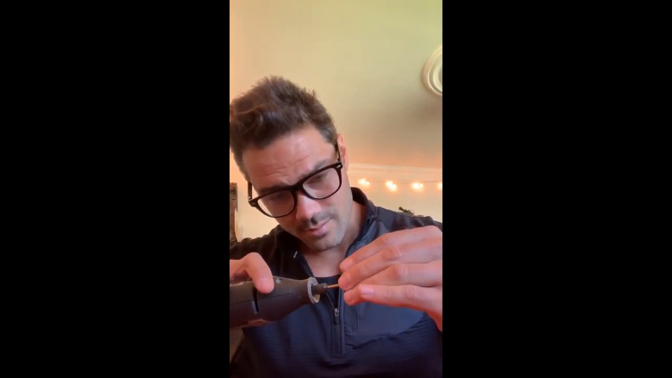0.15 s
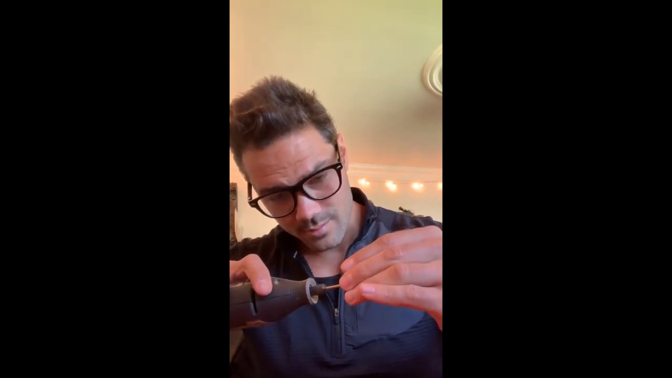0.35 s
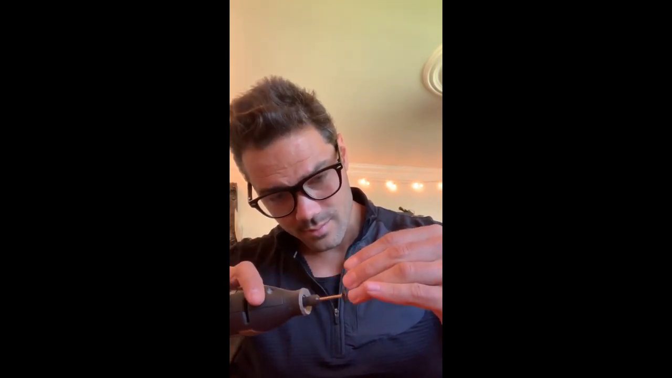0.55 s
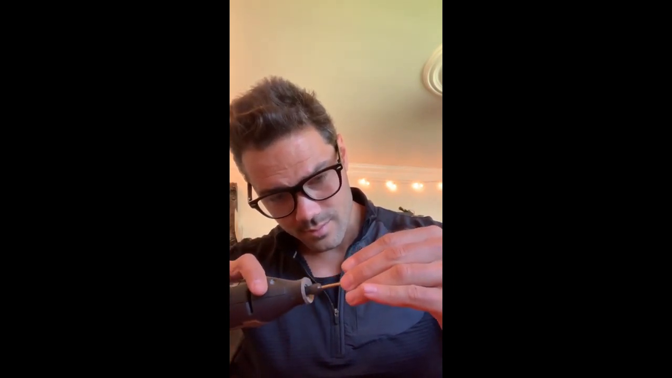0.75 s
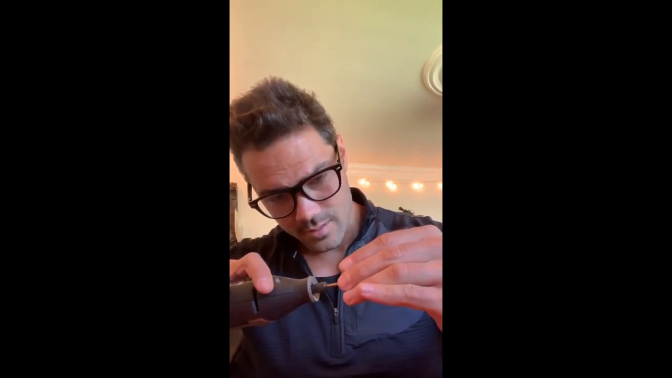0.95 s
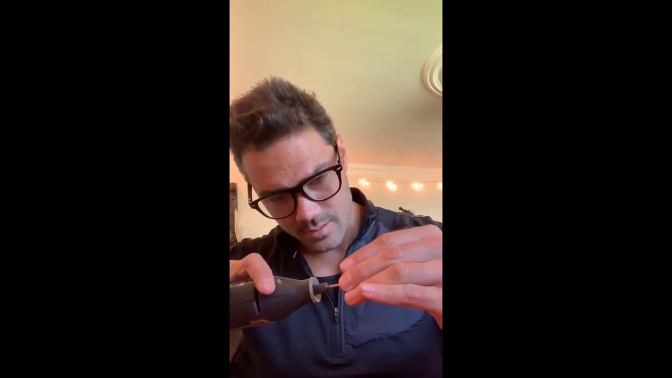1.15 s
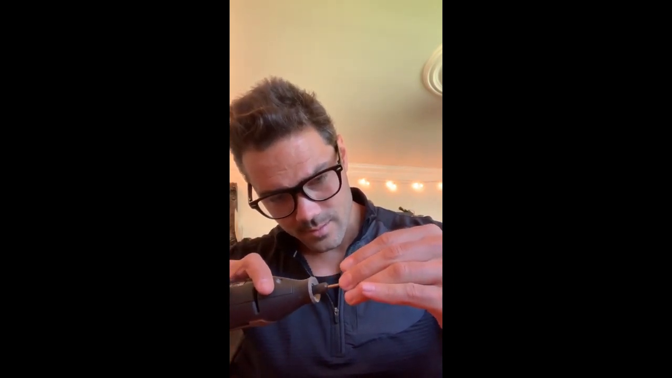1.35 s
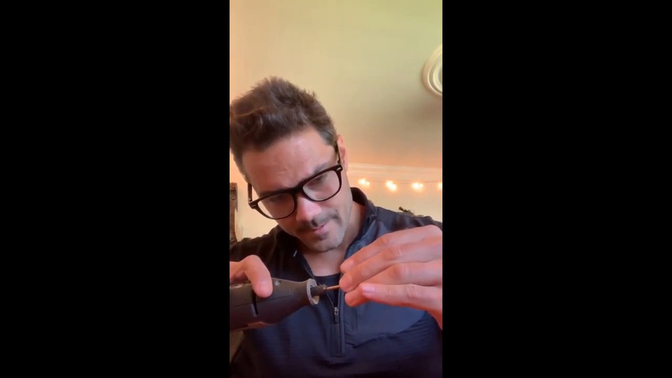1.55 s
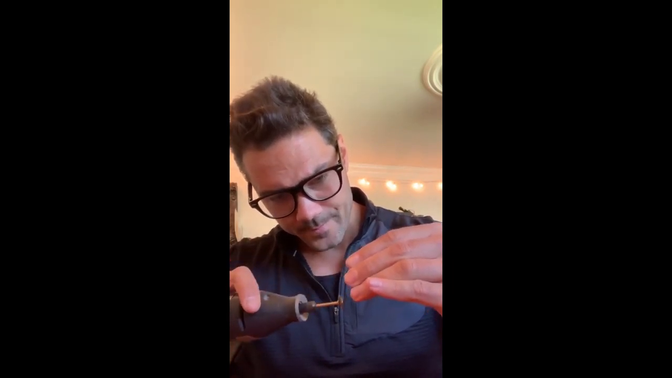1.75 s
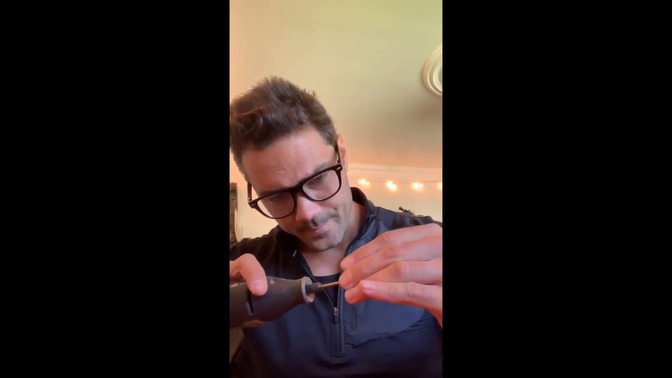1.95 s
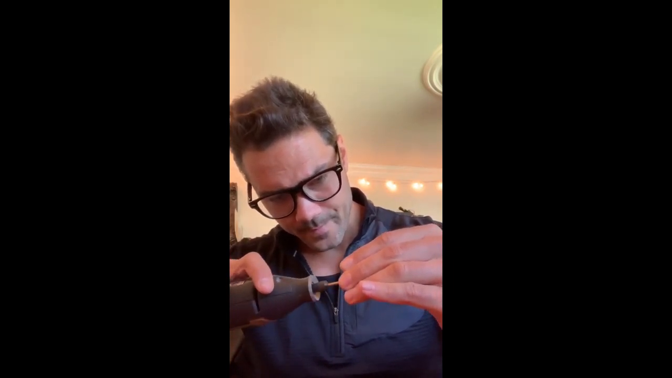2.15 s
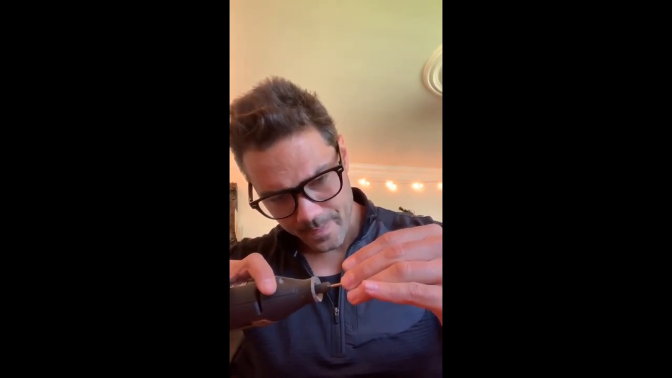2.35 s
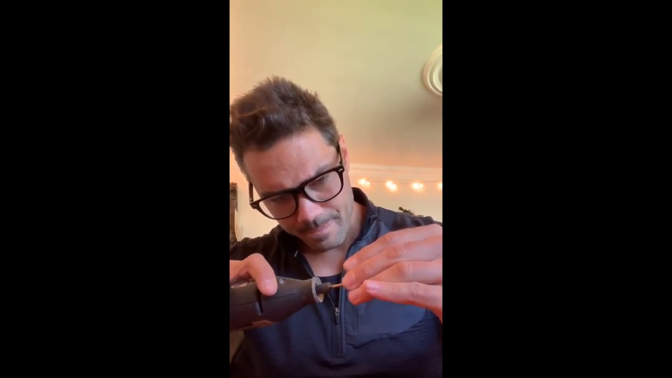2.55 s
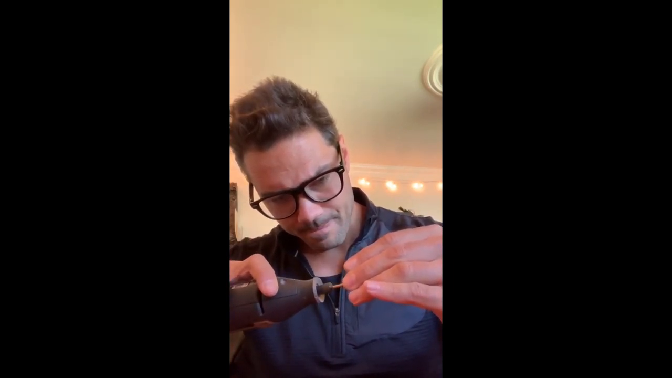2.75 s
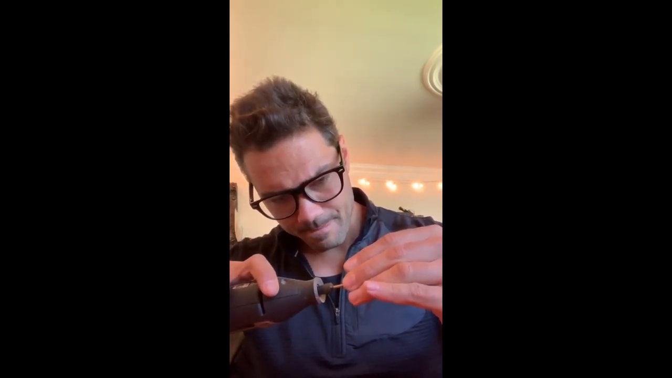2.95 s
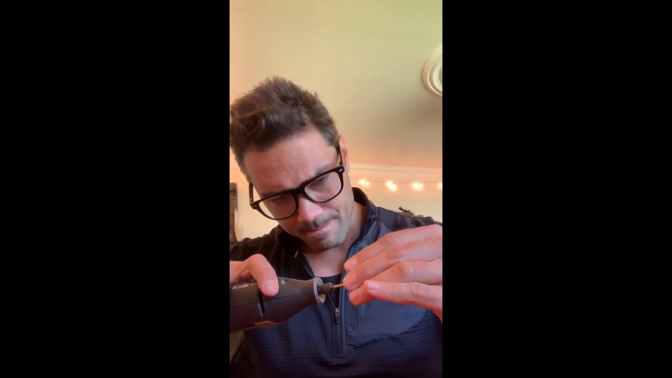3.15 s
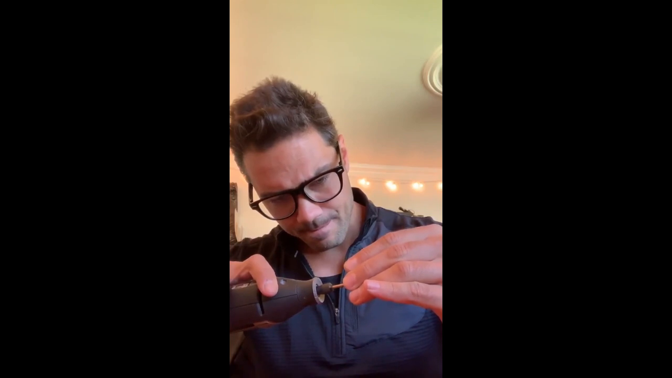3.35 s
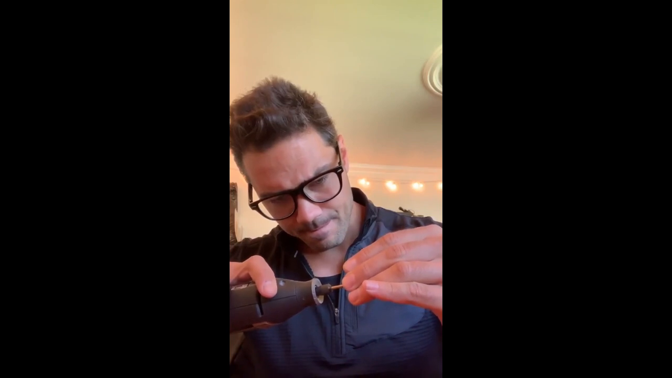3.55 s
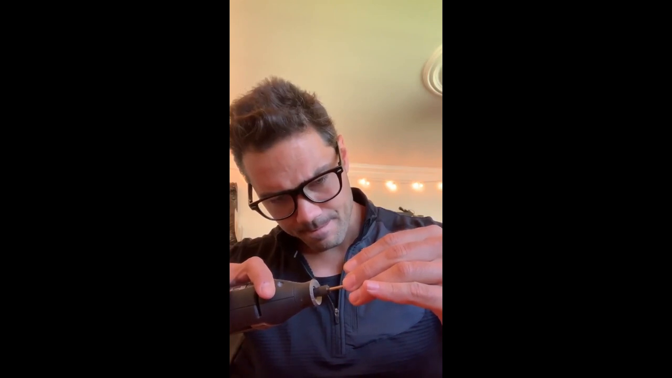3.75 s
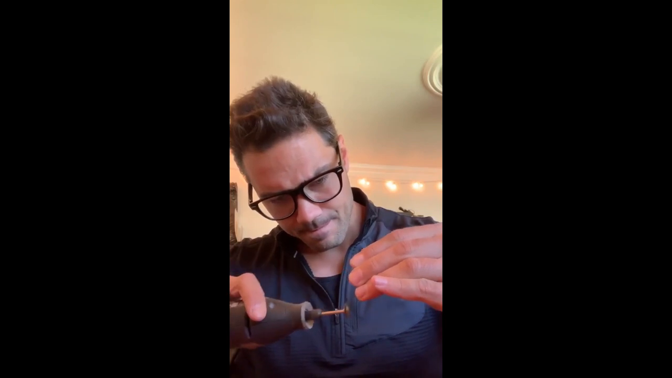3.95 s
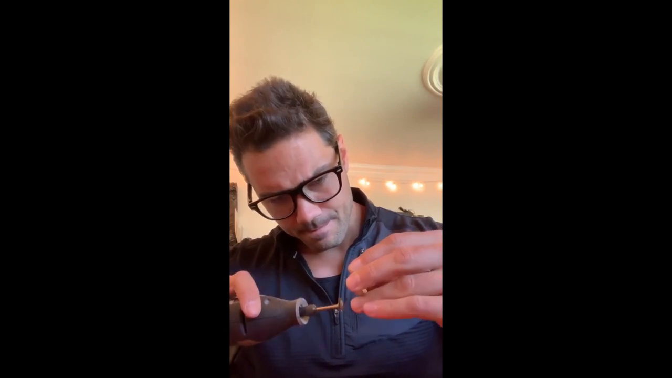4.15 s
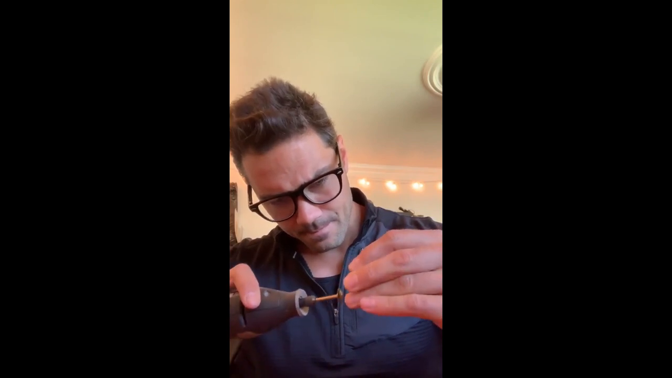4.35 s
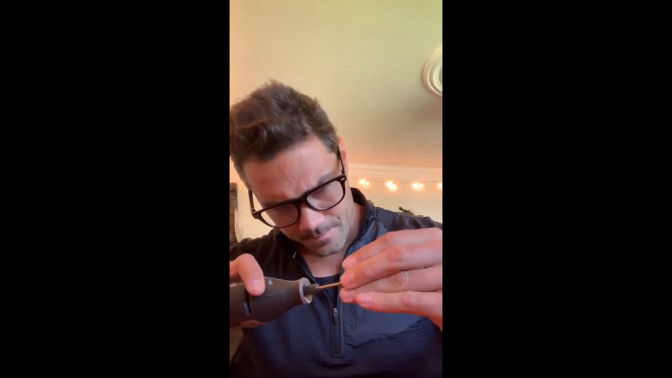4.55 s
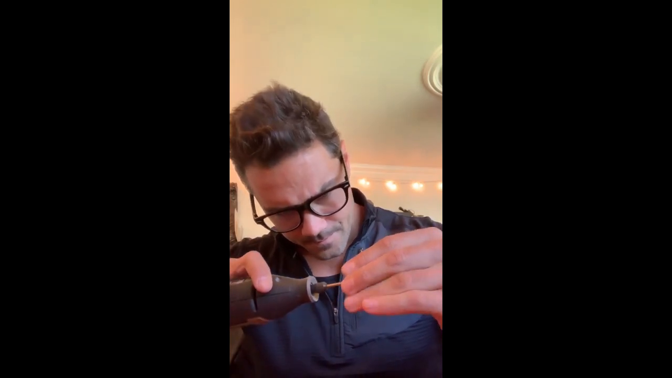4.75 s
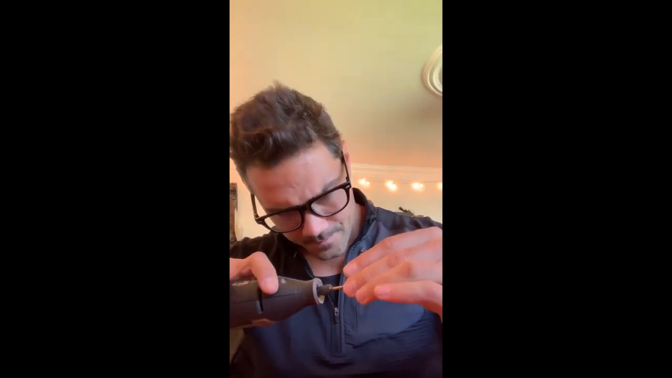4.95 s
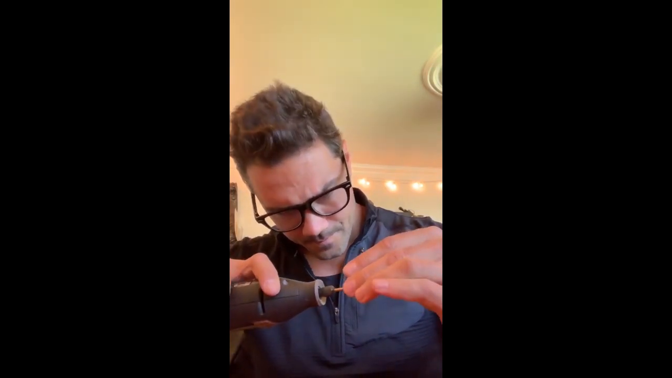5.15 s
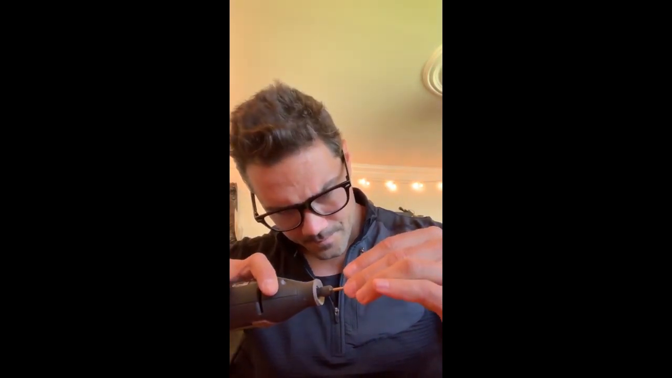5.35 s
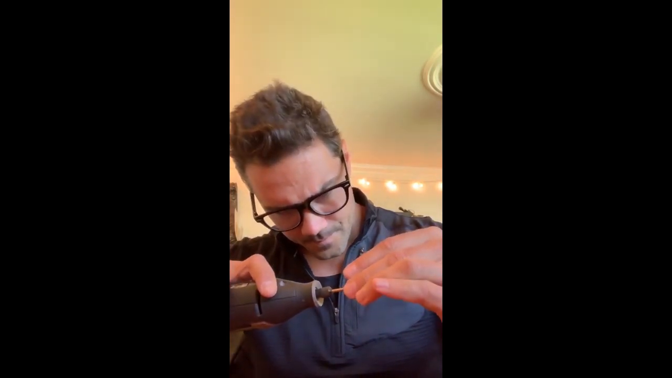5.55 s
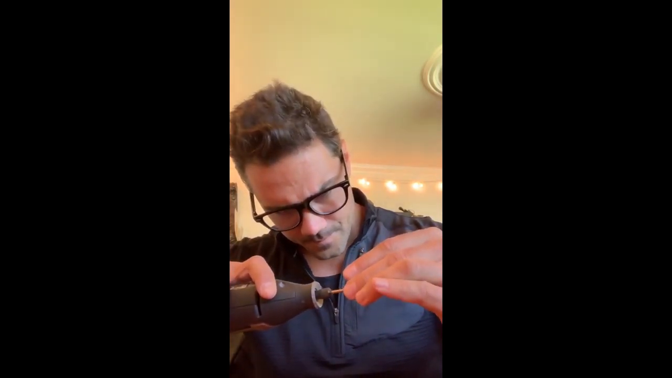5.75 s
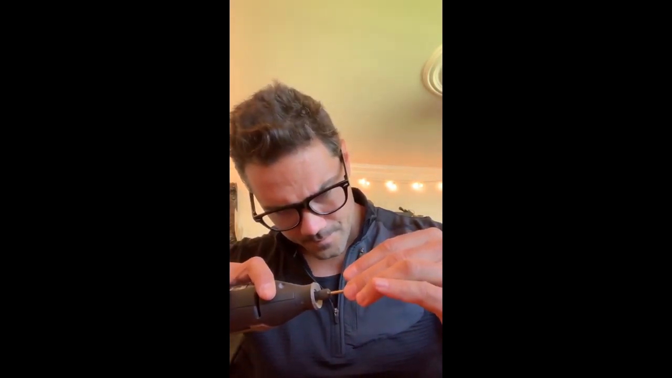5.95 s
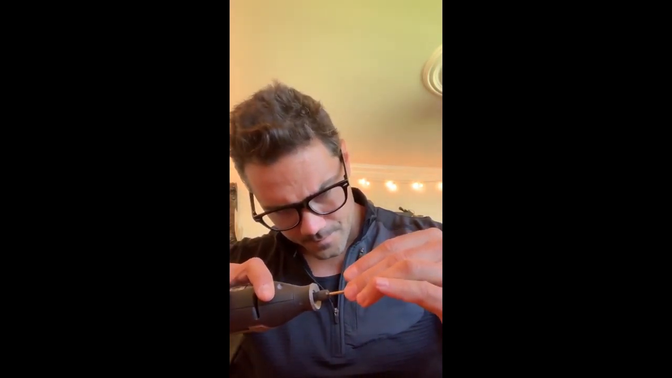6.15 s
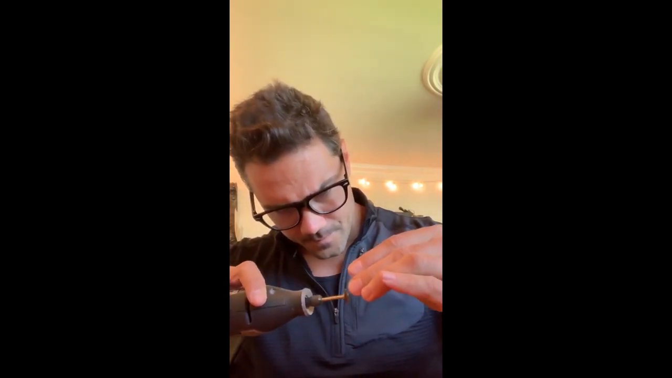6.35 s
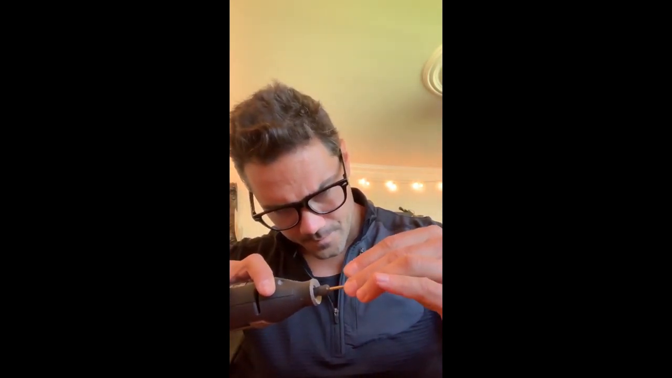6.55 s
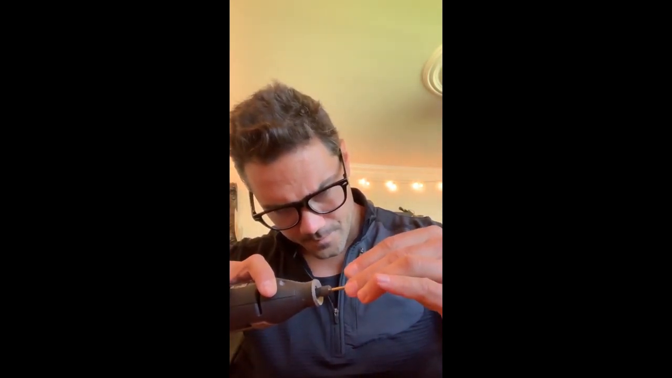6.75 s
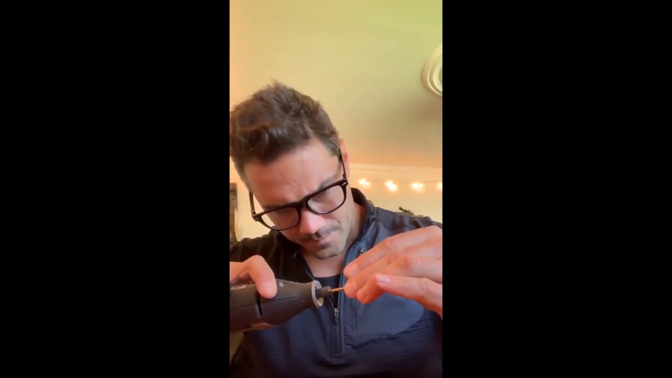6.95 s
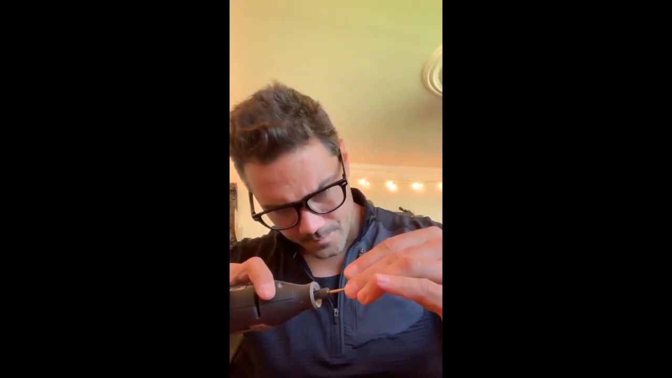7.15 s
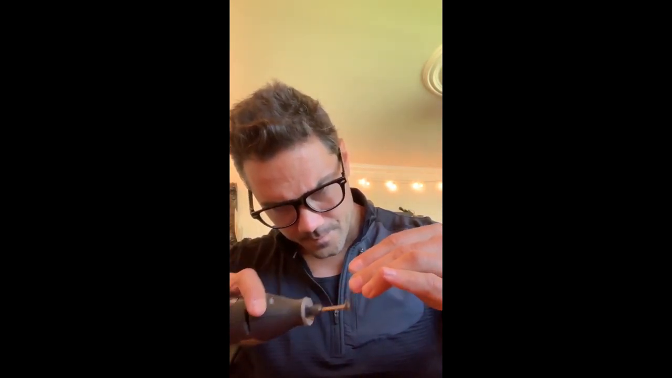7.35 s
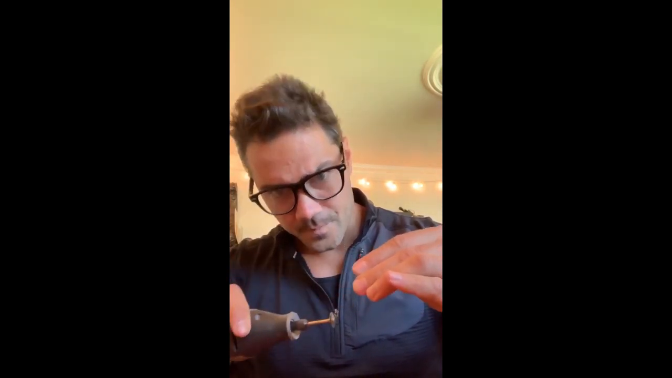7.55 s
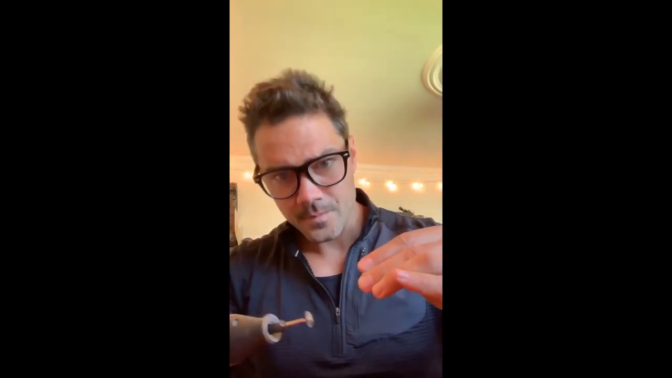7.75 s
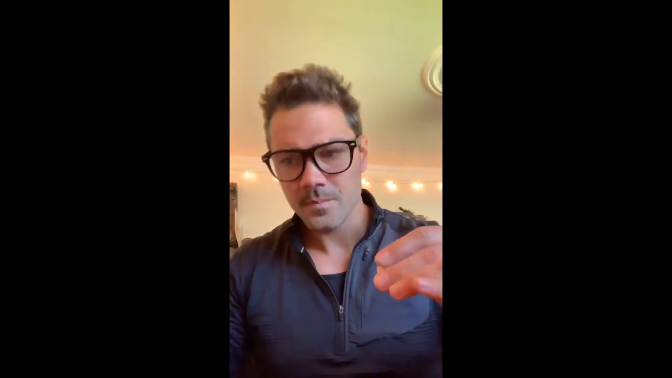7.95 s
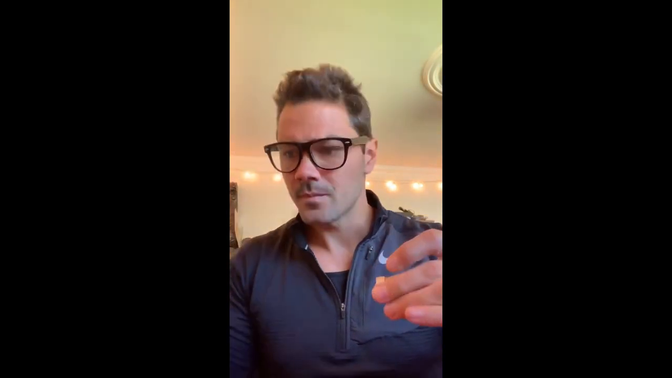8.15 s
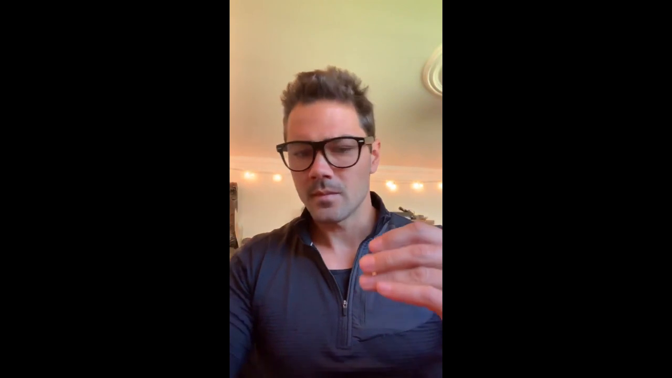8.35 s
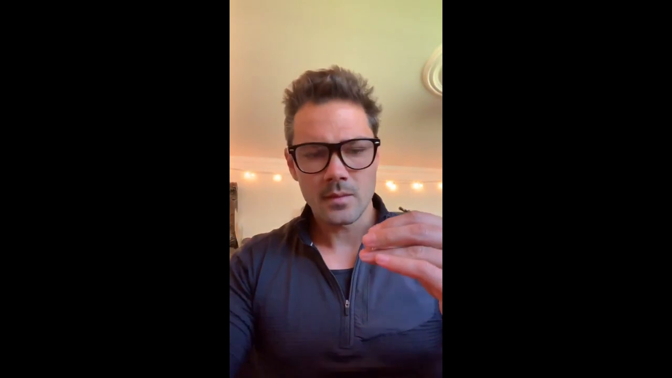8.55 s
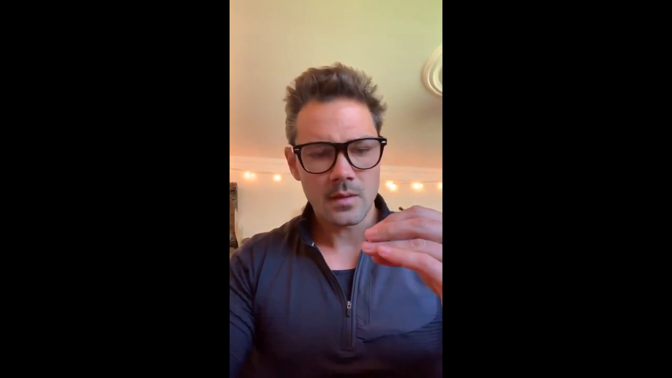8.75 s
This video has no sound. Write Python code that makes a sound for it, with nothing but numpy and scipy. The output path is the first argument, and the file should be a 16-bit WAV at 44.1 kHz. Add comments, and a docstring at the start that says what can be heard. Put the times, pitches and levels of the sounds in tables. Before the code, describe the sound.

A small handheld rotary tool is already at full speed, close to a stereo microphone in a small room. A firm low motor hum near 375 Hz, buzzing overtones and a thin whine around 9 kHz sit inside strong, bright fan hiss, with a rapid electric throb. From 0.2 s a felt tip polishes metal in irregular strokes, with light contact and harder presses around 0.5, 1.7, 3.9, 6.1 and 7.3 s; each adds a rough, beating rub and pulls the pitch down slightly before it recovers. Around 4.0-4.5 s and again at 7.5 s the vents turn closer and the airy jet brightens. The tip lifts at about 7.45 s and the motor runs free. At 7.9 s it is switched off: the throb stops, and pitch, whine and hiss fall steadily through faint patchy brush ticking, still coasting at 8.8 s over quiet room air and low rumble.

```python
"""Rotary tool polishing metal

A hand-held rotary tool runs at full speed in a small room; a felt tip is pressed on a small metal piece in strokes.
Shaft, armature slots and commutator sing as cosines at multiples of the turning rate, which sags under load.
Fan hiss and room air are coloured noise in stereo. After the switch the tool coasts down and the brushes tick.
"""
import sys
import numpy as np
from scipy import signal
from scipy.fft import rfft, irfft, next_fast_len
from scipy.io import wavfile

SR = 44100
rng = np.random.default_rng(int(sys.argv[2]) if len(sys.argv) > 2 else 0)


def materialize(psi):
    """Save the field psi as 16-bit PCM at rate SR to the path in sys.argv[1].

    A 1-D psi becomes a single channel; in a 2-D psi each row is a channel.
    """
    bounded = np.clip(np.atleast_2d(psi).T, -1, 1)
    quanta = np.round(bounded * 32767).astype(np.int16)
    wavfile.write(sys.argv[1], SR, quanta)


N = 388521

# Room air, rumble, mains hum: freq_hz, relative_db_per_hz
ROOM_AIR = [(250, -20), (480, -8), (640, -12), (950, 0), (1400, -4), (2200, -7), (3000, -20), (6000, -30)]
RUMBLE = [(8, -13), (25, 0), (40, -7), (85, -1), (170, -6.5), (400, -29.5), (900, -69)]
MAINS_HUM = [(40, -48.5), (56, -16.5), (61, -0.5), (66, -12), (85, -50)]
# Low background: time_s, hum_db, hum_octave_db, rumble_db
LOW_LEVELS = [(0, -55, -58, -50), (0.5, -52, -56, -48), (0.9, -60, -58, -53), (2, -64, -61, -55),
              (3.8, -67, -65, -57), (4.3, -58, -59, -52), (5.5, -54, -56, -51), (6.35, -62, -56, -52),
              (6.65, -48, -54, -51), (6.95, -62, -55, -54), (7.4, -40, -50, -54), (7.85, -57, -50, -52),
              (8.1, -49, -51, -51), (8.81, -49, -49, -53)]
ROOM_AIR_DB = -43.5

# Stereo noise: freq_hz, likeness_0_to_1 / left_lead_rad / left_minus_right_db
LIKENESS = [(60, 1), (450, 0.99), (1500, 0.73), (2000, 0.28), (2800, 0.56), (3400, 1), (4400, 0.42),
            (5000, 0.34), (6300, 0.22), (6900, 0.46), (8200, 0.66), (9100, 1), (16000, 1)]
LEFT_LEAD = [(10, 0), (130, -.3), (1200, -.3), (1700, 0), (2400, -1.5), (3300, -.6), (4100, .3),
             (4800, -2.8), (6100, -3.2), (6600, -7), (8400, -2 * np.pi), (16000, -2 * np.pi)]
TILT = [(30, .3), (130, 2.5), (390, 3.5), (1200, 2), (1600, 0), (2200, 4), (2800, -1), (6000, 0),
        (6600, -2), (7500, 0), (16000, 0)]

# Fan hiss and air jet: freq_hz, relative_db_per_hz
HISS = [(120, -20.5), (200, -18), (330, -9), (630, -19.5), (1000, -9), (1300, -6), (1680, -13), (2400, -6),
        (3500, -7), (5300, -4), (7500, -5), (9000, -3.5), (13000, -6.5), (15500, -4.5)]
JET = [(6000, -22), (8500, -5.5), (10200, -5.5), (11500, -6), (13000, -3.5), (15500, -14.5)]
# Housing resonances in the hiss: freq_hz, width_hz, gain_db
HOUSING = [(490.4, 91, 8.5), (860, 122, 10.5), (1535.3, 41.6, 3.5), (1864, 90, 4.5), (2174, 112, 4.5),
           (3866, 1010, 4.5), (6920, 483, 4)]

# Tones: multiple_of_turn (rounded in use), db_over_layer, left_minus_right_db, left_lead_rad
HUM = [(1, 0.5, 3.5, -0.445)]
RUB = [(2, 1, -0.5, -0.22), (6, 0, 12, -0.31), (4, -11.5, -3.5, -0.0036)]
BEARING = [(3, 0, 4, -0.37), (5, -12.5, -2, 0.5)]
FAN = [(12, 1, -0.5, 0.4262), (4, -9, -1.5, 0.5), (6, -7, 6.5, 1.3), (13, 0, -2.5, -2.5), (15, 1, -0.5, 3),
       (16, -3.5, 3, -2.5), (17, -3.5, 1, 1.51)]
BLADE = [(12, 0, -0.5, 0.4)]
COMMUTATOR_BARS = [(24, 1.5, 0, -0.256), (25, -11.5, 0, 0), (23, -13.5, 0, 0)]
UPPER = [(31, -6.5, 0, 0), (32, 1, 0, 0), (33, -2.5, 0.0011, 0), (40, -2.5, 0.00092, 0), (41, -3, 0.001, 0),
         (48, 5, 0, 0), (51, -2.5, 0, 0), (56, 6.5, 0, 0), (64, 1.5, 0, 0), (63.3, 4.5, 0, 0),
         (72, 2, 0, 0), (80, 0.5, 0, 0)]
# Slot tone sidebands: throb_multiple, db_over_pull, left_minus_right_db, left_lead_rad
THROB = [(-3, -9.5, 0.5, -2), (-2, -2, 0, -1.9), (-1, -1, -2.5, 1), (0, -12, 6.5, -3), (1, -9.5, -3, -1.6),
         (2, -9, 0, 1.5), (3, -7, 1.5, -0.94), (4, -13.5, 4, -2.02), (6, -14.5, 1.5, -2)]
# Brush ticks at full speed, before random spread: freq_hz, db_per_multiple
BRUSH = [(600, -52), (1100, -47), (2000, -57), (6500, -58), (9500, -46.5), (15500, -46)]

# Commutator whine and slot tone: time_s, level_db
WHINE = [(0, -30), (0.55, -25), (1.43, -29), (1.65, -24), (1.74, -34), (1.91, -24), (2.64, -30.5),
         (2.86, -25), (3.3, -29.5), (3.56, -26), (3.89, -28), (4.42, -24.5), (5.05, -37), (5.3, -35),
         (5.65, -30), (6.18, -24), (6.97, -35), (7.15, -28), (7.3, -40), (7.4, -29), (7.72, -19.5),
         (7.89, -21.5), (7.94, -29), (8.04, -21), (8.1, -37), (8.14, -29), (8.33, -34), (8.42, -42),
         (8.5, -36), (8.56, -56), (8.81, -58)]
PULL = [(0, -28.5), (0.46, -29), (0.83, -30), (3.45, -29.5), (4.07, -32), (4.38, -33), (4.71, -28),
        (6.18, -27), (6.49, -31), (7.22, -28.5), (7.52, -34), (7.9, -38.5)]
# Layer laws: free_running_db, db_per_load, drawn_back_db, current_off_db, db_per_speed_octave
HUM_LAW = (-34, 0.45, 2, 2.5, 22)
BEARING_LAW = (-32, -0.3, 0.5, -4, 40)
FAN_LAW = (-42.5, 0.1, 3, -5, 3)
UPPER_LAW = (-38, -1, 2.5, -9, 7)
HISS_LAW = (-20.6, 0, -0.7, -0.3, 15)
JET_LAW = (-38.5, 0, 10, 9, 9)

# Felt tip on metal: touch_s, full_pressure_s, lift_start_s, load_turns_per_s (settled speed loss)
STROKES = [(0.2, 0.5, 0.64, 5), (1.1, 1.2, 1.53, 1.3), (1.49, 1.72, 1.77, 9.5), (1.8, 1.85, 2.1, 1.5),
           (2.45, 2.8, 3.4, 2.6), (3.4, 3.93, 3.96, 10.5), (4.0, 4.05, 4.75, 1.4), (5.1, 5.3, 5.75, 2.6),
           (5.72, 6.03, 6.14, 11.5), (6.14, 6.18, 6.37, 8.5), (6.9, 7.25, 7.43, 7)]
# Tool drawn back, vents towards the microphone: start_s, length_s, share
DRAWN_BACK = [(1.82, 0.15, 0.4), (4.05, 0.45, 1.05), (7.55, 0.3, 1)]

SWITCH_OFF_S, LIFT_S, TURN_S = 7.905, 0.04, 0.12
FREE_TURNS_PER_S, SPEED_LAG_S = 375.9, 0.13
COAST_S, FRICTION_TURNS_PER_S = 2.25, 200
THROB_HZ, THROB_START_S, SLOTS = 120, 0.002117, 8
RUB_DB, RUB_FLOOR, RUB_POWER = -41, 0.1, 1.4  # layer level at load ten; share without contact
BEAT_HZ, BEAT_DB, BEAT_POWER = 28.08, -0.5, 0.9  # offset from sixth multiple; dB over RUB_DB
BLADE_DB, COAST_PATCHY_DB, BRUSH_DB_PER_OCTAVE = -46, 2.5, 4
CUTOFF_HZ = 15420
TIME_S = np.arange(N) / SR


def from_db(db):
    """Amplitude gain of a level."""
    return 10 ** (np.asarray(db) / 20)


def rms_one(x):
    """Scale to rms 1."""
    return x / np.sqrt(np.mean(x ** 2) + 1e-20)


def in_time(rows):
    """Interpolate each column to one value per sample."""
    time_s, *columns = np.transpose(rows)
    return [np.interp(TIME_S, time_s, column) for column in columns]


def at_hz(points, hz):
    """Interpolate a spectrum on a log-frequency axis."""
    freq_hz, value = np.array(points).T
    return np.interp(np.log(hz), np.log(freq_hz + 1), value)


def drift(corner_hz):
    """Random wander of spread 1: noise through a double pole, made at SR / 40."""
    pole = np.exp(-2 * np.pi * corner_hz * 40 / SR)
    noise = rng.standard_normal(N // 40 + 2002)
    slow = signal.lfilter([1], [1, -2 * pole, pole ** 2], noise)[2000:]  # skip the settling
    return np.interp(np.arange(N) / 40, np.arange(len(slow)), rms_one(slow))


def at_ports(angle, level_db, tilt_db, lead_rad):
    """A tone at the two microphone ports, split by level and phase."""
    side = np.array([[.5], [-.5]])
    return np.sqrt(2) * from_db(level_db + tilt_db * side) * np.cos(angle + lead_rad * side)


def hiss(spectrum, resonances=()):
    """Coloured noise, partly shared by the two ports; rms 1."""
    size = next_fast_len(N)
    hz = np.fft.rfftfreq(size, 1 / SR) + 1
    level_db = at_hz(spectrum, hz)
    for center_hz, width_hz, gain_db in resonances:
        level_db = level_db + gain_db / (1 + (2 * (hz - center_hz) / width_hz) ** 2)
    shared, own = rfft(rng.standard_normal((2, size)))
    alike = np.clip(at_hz(LIKENESS, hz), 0, 1)
    side = np.array([[1], [-1]])
    pair = np.sqrt(1 + alike) * shared + side * np.sqrt(1 - alike) * own
    pair = pair * from_db(level_db + side * at_hz(TILT, hz) / 2)
    pair = pair * np.exp(.5j * side * at_hz(LEFT_LEAD, hz))
    return rms_one(irfft(pair, size)[:, :N])


def room_background():
    """Steady room air, with rumble, mains hum and its octave at changing levels."""
    hum_db, octave_db, rumble_db = in_time(LOW_LEVELS)
    air = from_db(ROOM_AIR_DB) * hiss(ROOM_AIR)
    rumble = from_db(rumble_db) * hiss(RUMBLE)
    hum = from_db(hum_db) * hiss(MAINS_HUM)
    octave = from_db(octave_db) * hiss(np.array(MAINS_HUM) * [2, 1])
    return air + rumble + hum + octave


def fan_air(level):
    """Fan noise coloured by the housing, plus a jet that rises when drawn back."""
    fan = from_db(level(HISS_LAW) + 0.52 * drift(8)) * hiss(HISS, HOUSING)
    jet = from_db(level(JET_LAW) + 1.04 * drift(6.4)) * hiss(JET)
    return fan + jet


def drawn_back():
    """Share of the vents' turn towards the microphone; turning away takes twice as long."""
    share = np.zeros(N)
    for start_s, length_s, size in DRAWN_BACK:
        end_s = start_s + length_s
        share += size * np.interp(TIME_S, [start_s - TURN_S, start_s, end_s, end_s + 2 * TURN_S], [0, 1, 1, 0])
    return share


def load():
    """Load of the strokes: pressure builds, holds and is lifted; overlaps add."""
    total = np.zeros(N)
    for touch_s, full_s, lift_s, size in STROKES:
        total += size * np.interp(TIME_S, [touch_s, full_s, lift_s, lift_s + LIFT_S], [0, 1, 1, 0])
    return total


def speed(pressure):
    """Turns per second: lagged sag under load, then decay towards minus the friction term."""
    pole = np.exp(-1 / (SPEED_LAG_S * SR))
    driven = FREE_TURNS_PER_S - signal.lfilter([1 - pole], [1, -pole], pressure)
    since_off_s = np.maximum(TIME_S - SWITCH_OFF_S, 0)
    return (driven + FRICTION_TURNS_PER_S) * np.exp(-since_off_s / COAST_S) - FRICTION_TURNS_PER_S


def below_limit(tone_hz):
    """Gain fading linearly to zero from 16 to 17 kHz."""
    return np.clip((17000 - tone_hz) / 1000, 0, 1)


def tones(table, turn_rad, per_s, layer_db, waver_db, waver_hz):
    """Multiples of the turning rate, each wavering in level on its own."""
    out = 0
    for multiple, db, tilt_db, lead_rad in table:
        multiple = np.round(multiple)
        level_db = layer_db + db + waver_db * drift(waver_hz)
        angle = multiple * turn_rad + rng.uniform(0, 2 * np.pi)
        out = out + below_limit(multiple * per_s) * at_ports(angle, level_db, tilt_db, lead_rad)
    return out


def brushes(turn_rad, per_s, octaves):
    """Brush ticks without current: many patchy multiples of the turn, the same in both channels."""
    out, start = np.zeros(N), int(SWITCH_OFF_S * SR)
    for multiple in range(3, 84):
        level_db = at_hz(BRUSH, multiple * per_s) + BRUSH_DB_PER_OCTAVE * octaves
        level_db = level_db + 3.5 * rng.standard_normal() + 5 * drift(4)
        tone = np.cos(multiple * turn_rad + rng.uniform(0, 2 * np.pi))
        out[start:] += (below_limit(multiple * per_s) * from_db(level_db) * tone)[start:]
    return out * np.clip(-octaves / 0.1, 0, 1)


def tip_rub(turn_rad, per_s, pressure, off):
    """Felt on metal: multiples growing with load, and a line above the sixth that beats with it."""
    contact = RUB_FLOOR * (1 - off) + (pressure / 10) ** RUB_POWER
    rub = contact * tones(RUB, turn_rad, per_s, RUB_DB, 1.9, 13)
    beat_angle = 6 * turn_rad + 2 * np.pi * BEAT_HZ * TIME_S
    beat = (pressure / 10) ** BEAT_POWER * at_ports(beat_angle, RUB_DB + BEAT_DB, 5, -.3)
    return rub + beat


def slots(turn_rad):
    """Armature slot tone throbbing at twice the mains rate, as sidebands; stops with the current."""
    pull_db = in_time(PULL)[0]
    throb_rad = 2 * np.pi * THROB_HZ * (TIME_S - THROB_START_S)
    out = 0
    for multiple, db, tilt_db, lead_rad in THROB:
        angle = SLOTS * turn_rad + np.round(multiple) * throb_rad
        out = out + at_ports(angle, pull_db + db + 2.35 * drift(12.3), tilt_db, lead_rad)
    return out * np.clip((SWITCH_OFF_S - TIME_S) / 0.0134, 0, 1)


def rotor(turn_rad, per_s, level, off):
    """Shaft, bearing, fan, commutator and upper tones locked to the turn; patchier when coasting."""
    patchy_db = COAST_PATCHY_DB * off
    hum = tones(HUM, turn_rad, per_s, level(HUM_LAW), 0.8 + patchy_db / 2, 27.3)
    bearing = tones(BEARING, turn_rad, per_s, level(BEARING_LAW), 1.606 + patchy_db, 30)
    fan = tones(FAN, turn_rad, per_s, level(FAN_LAW), 3.2, 6)
    blade = off * tones(BLADE, turn_rad, per_s, BLADE_DB, 5, 9)  # stands out without current
    whine = tones(COMMUTATOR_BARS, turn_rad, per_s, in_time(WHINE)[0], 1.86, 17.3)
    upper = tones(UPPER, turn_rad, per_s, level(UPPER_LAW), 3.32 + patchy_db, 10.2)
    return hum + bearing + fan + blade + whine + upper


def scene():
    """Room, air and motor tones driven by one load and one speed."""
    pressure, back = load(), drawn_back()
    per_s = speed(pressure)
    octaves = np.log2(per_s / FREE_TURNS_PER_S) * (TIME_S > SWITCH_OFF_S)  # coasting only
    off = np.clip(-octaves / 0.05, 0, 1)

    def level(law):
        """Layer dB from load, aim and coasting."""
        free_db, per_load, back_db, off_db, per_octave = law
        return free_db + per_load * pressure + back_db * back + off_db * off + per_octave * octaves

    per_s = per_s * (1 + 0.000498 * drift(25.6))  # speed trembles
    turn_rad = 2 * np.pi * np.cumsum(per_s) / SR
    background = room_background() + fan_air(level)
    contact = brushes(turn_rad, per_s, octaves) + tip_rub(turn_rad, per_s, pressure, off)
    return background + contact + slots(turn_rad) + rotor(turn_rad, per_s, level, off)


def record(dry):
    """Steep elliptic low-pass cuts the top."""
    return signal.sosfilt(signal.ellip(14, .3, 90, CUTOFF_HZ, fs=SR, output="sos"), dry)


dry = scene()
out = record(dry)
materialize(out)
```